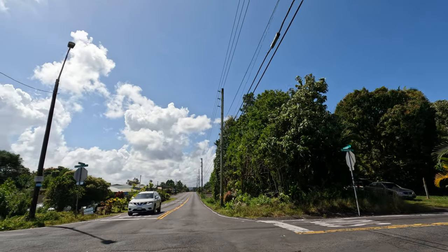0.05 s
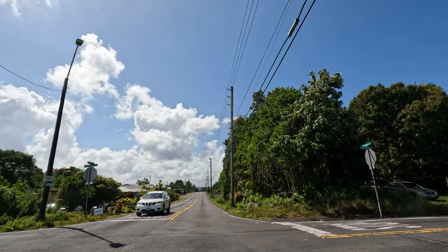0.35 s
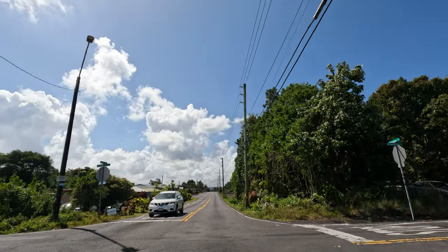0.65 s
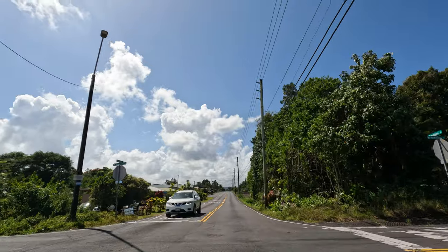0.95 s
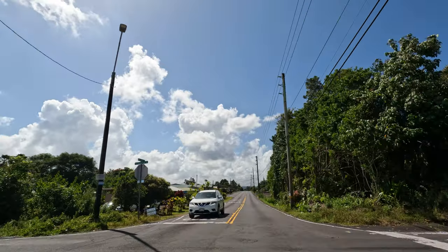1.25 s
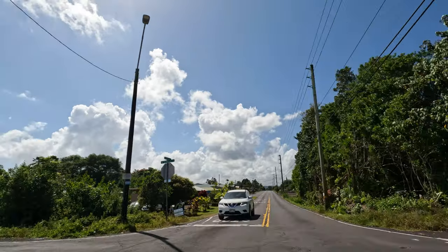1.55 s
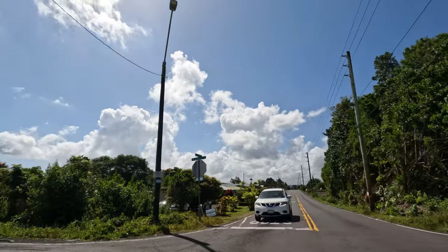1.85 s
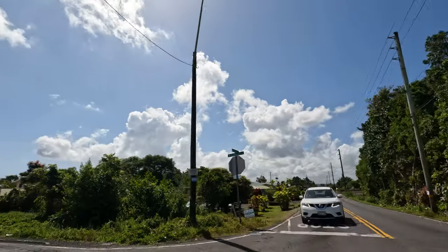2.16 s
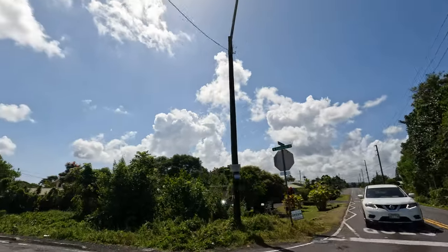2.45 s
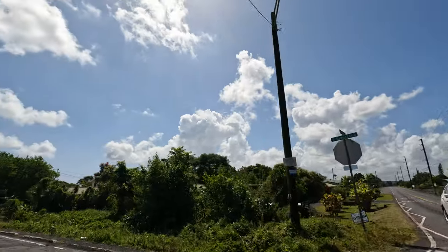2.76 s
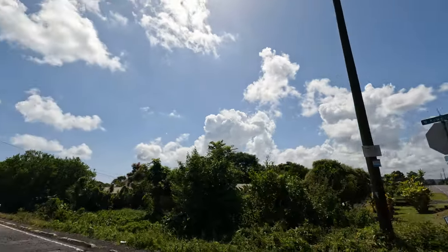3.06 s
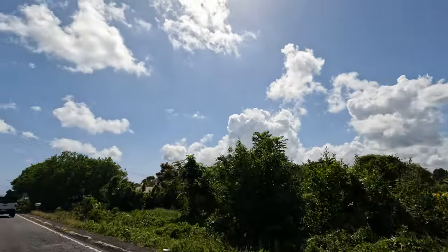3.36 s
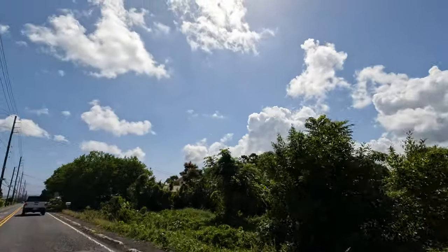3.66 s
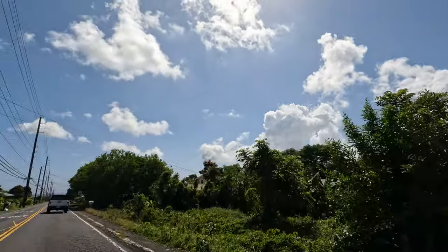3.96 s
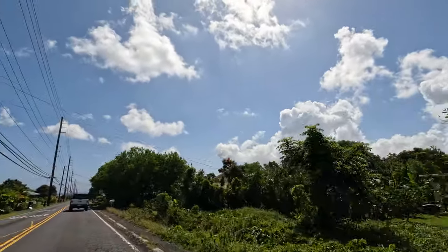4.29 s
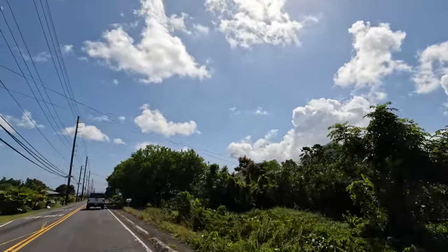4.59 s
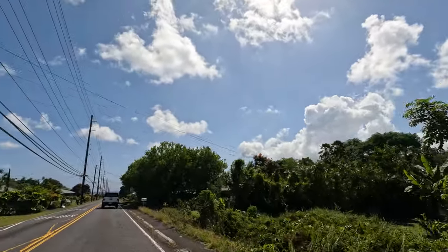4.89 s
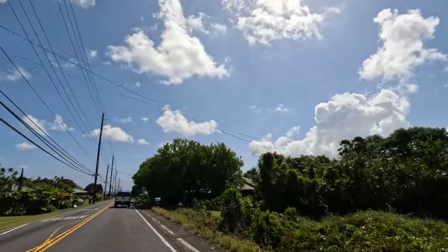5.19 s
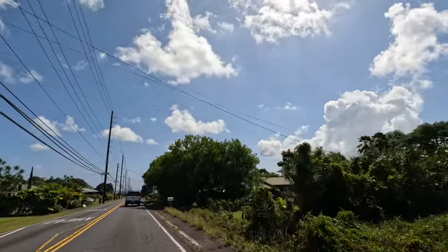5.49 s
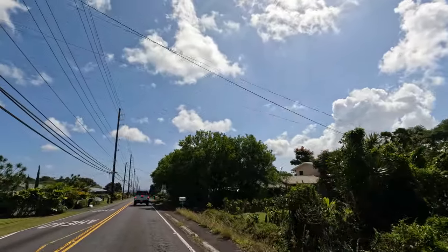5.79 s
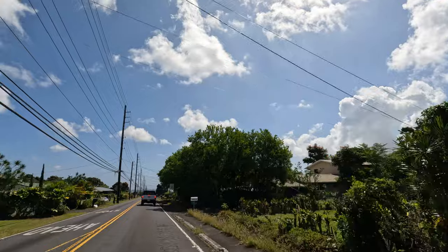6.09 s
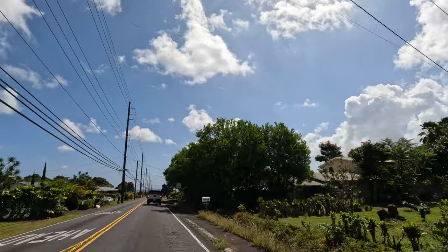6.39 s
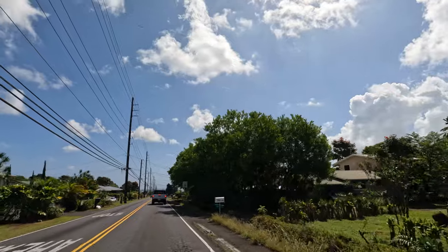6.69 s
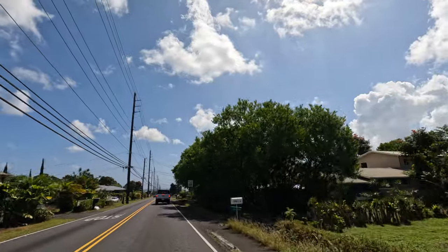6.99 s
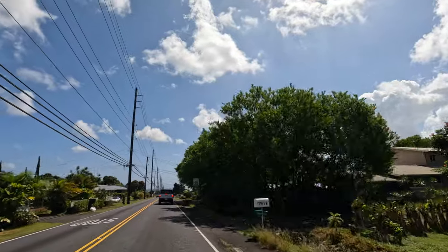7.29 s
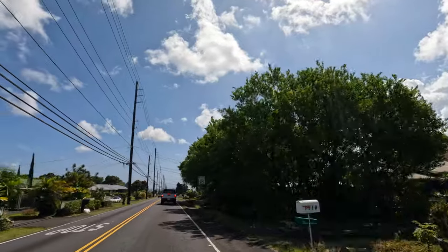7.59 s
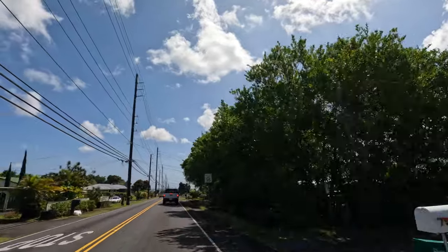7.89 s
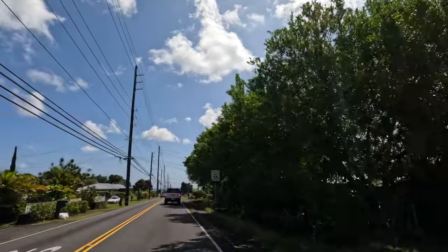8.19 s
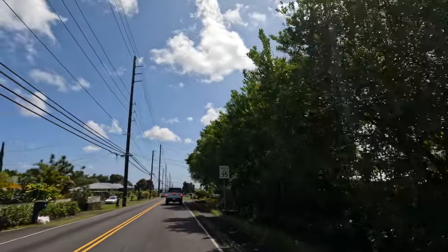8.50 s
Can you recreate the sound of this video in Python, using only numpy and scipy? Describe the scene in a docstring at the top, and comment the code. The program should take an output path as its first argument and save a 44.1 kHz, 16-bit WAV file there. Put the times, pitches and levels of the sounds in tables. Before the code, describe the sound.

Wind buffets and thumps on the microphone of a car gathering speed, over tyre noise on asphalt and faint bird chirps.

```python
"""Car gathering speed on a country road

The microphone rides out in the airstream as the car pulls away from a junction. Eddies thump and slap
right on it and their rush grows with speed, taking over from the tyres on the asphalt below.
Small birds chirp far off in the roadside bushes, faint whines glide and a little grit ticks.
A limiter holds down the strongest buffeting."""
import sys
import numpy as np
from scipy import signal
from scipy.io import wavfile
from scipy.ndimage import uniform_filter1d, minimum_filter1d, map_coordinates

SR = 44100
rng = np.random.default_rng(int(sys.argv[2]) if len(sys.argv) > 2 else 0)


def store_pcm(level_fs):
    """Save levels as 16-bit WAV."""
    pcm = np.round(np.clip(level_fs, -1, 1) * 32767).astype(np.int16)
    wavfile.write(sys.argv[1], SR, np.atleast_2d(pcm).T)


N = 381465
TOP_HZ = 15700

# air moving past the microphone: time_s, share_of_cruising_speed
AIRSPEED = [(0, 0.21), (.55, 0.28), (1.0, 0.42), (2.8, 0.56), (3.6, 0.61), (4.45, 0.66), (4.9, 0.91),
            (6.2, 0.93), (7.4, 0.95), (8.65, 0.98)]
# gusts (+) and lulls (-): middle_s, length_s, rush_swing_db, boom_swing_db, rush_bend_octaves
GUSTS = [(0.052, 0.043, -3, -3.5, 0.0047), (0.189, .17, 4.5, -2, -.2), (.45, 0.35, 4, -2.5, -0.16),
         (0.68, .17, 8, -0.5, .2), (0.785, 0.074, -1, -2, 0), (1.13, .5, -1.5, 1.5, .2),
         (1.53, .2, -2, -7, -0.028), (1.678, 0.1195, 1, 5.5, -0.092), (1.92, 0.183, 1, 1.5, .05),
         (2.35, 0.1995, 1, 2.5, 0.06), (2.578, 0.09, 5, 6, 0.01), (2.7, .16, 2.5, -2.5, 0.31),
         (2.98, .26, 1.5, 2, 0.32), (3.273, 0.23, -1, -3, 0), (3.508, .075, 6, 3, -0.27),
         (3.602, 0.084, 7.5, 4.5, 0.081), (3.7, .18, 2.5, 1, 0.19), (3.848, 0.25, 0.5, 4, -0.0064),
         (4.023, .071, 5.5, -2, -0.22), (4.1, 0.097, 0, -9, 0.0077), (4.15, 0.034, 3, 2, 0.04),
         (4.34, .14, -0.5, -2, 0), (4.449, .08, 9, 4, -0.32), (4.524, .08, 6, 3.5, -0.37),
         (4.651, 0.0641, 5, 3.5, -.1), (4.87, .24, 2.5, -1.5, 0.076), (5.214, 0.0796, 0, 2, -.05),
         (5.38, .28, -2, -5, -0.038), (5.66, 0.11996, -1, 4.5, -.1), (5.99, 0.68, 2.5, 1, 0.011),
         (6.43, .1, -3.5, -1.5, 0.08), (6.6, 0.247, 4.5, 2.5, -0.045), (6.78, 0.1026, 3.5, 2.5, 0.031),
         (6.98, 0.23, -1.5, -0.5, -0.063), (7.16, .16, 1.5, 2.5, -0.11), (7.55, .4, 1, -2, 0),
         (7.95, .1, 0.5, -1.5, -0.0035), (8.1, 0.66, 2, 0, 0.0056), (8.48, .3, 2, 0.5, 0.11),
         (8.64, 0.14, -1.5, -10, 0.09)]


def from_db(db):
    """Decibels to gain."""
    return 10 ** (np.asarray(db) / 20)


def unit_rms(x):
    """Scale to unit power."""
    return x / np.sqrt(np.mean(x ** 2) + 1e-20)


def curves(rows):
    """Each column after time_s, interpolated at every sample."""
    time_s, *columns = np.transpose(rows)
    return [np.interp(np.arange(N) / SR, time_s, column) for column in columns]


def swells(rows):
    """One smooth swell a row (middle_s, length_s, swings); each swing column summed over time."""
    t, rows = np.arange(N) / SR, np.array(rows)
    shapes = [np.cos(np.pi * np.clip((t - middle_s) / length_s, -.5, .5))
              for middle_s, length_s in rows[:, :2]]
    return rows[:, 2:].T @ np.array(shapes)


def band(x, low_hz, high_hz, order):
    """Butterworth band-pass."""
    sos = signal.butter(order, [low_hz, min(high_hz, .45 * SR)], "band", fs=SR, output="sos")
    return signal.sosfilt(sos, x + 1e-18)


def drift(rate_hz):
    """Smooth random wander of rms 1, rolling off above rate_hz."""
    pole = np.exp(-40 * np.pi * rate_hz / SR)
    white = rng.standard_normal(N // 20 + 2002)
    slow = signal.lfilter([1], [1, -2 * pole, pole * pole], white)[2000:]
    return np.interp(np.arange(N) / 20, np.arange(len(slow)), unit_rms(slow))


def coloured_noise(spectrum, flicker_db, flicker_hz):
    """Third-octave bands of noise, each flickering on its own; rms 1."""
    hz, db = np.transpose(spectrum)
    edges_hz = 14 * 2 ** (np.arange(31) / 3)
    white, out = rng.standard_normal((2, N + SR // 2)), np.zeros(N)
    for k, (low, high) in enumerate(zip(edges_hz, edges_hz[1:])):
        centre_hz, flicker = np.sqrt(low * high), drift(flicker_hz)
        if hz[0] <= centre_hz <= hz[-1]:
            level_db = np.interp(np.log(centre_hz), np.log(hz), db)
            out += from_db(level_db + flicker_db * flicker) * band(white[k % 2], low, high, order=3)[-N:]
    return unit_rms(out)


def steady(x, span_s):
    """Even out the slow swells of a noise and keep its quick lumps."""
    return x / np.sqrt(uniform_filter1d(x ** 2, int(span_s * SR)) + 1e-9)


def shifted(x, ratio):
    """Move the whole spectrum of a noise by a changing pitch ratio."""
    return map_coordinates(x, [np.cumsum(ratio)], order=3, mode="mirror")


def glide(pitches_hz, progress, jitter_hz):
    """An unsteady sine sliding through three pitches as progress runs from 0 to 1."""
    hz = np.polyval(np.polyfit([0, .5, 1], pitches_hz, 2), progress) + jitter_hz
    return np.sin(2 * np.pi * np.cumsum(hz) / SR)


def birds(rasp_hz=330, flutter_db=4, waver_db=1.1):
    """Distant birds: each note is a sliding whistle, and a fast uneven tremor makes it rasp."""
    # bird notes: start_s, length_s, start_hz, middle_hz, end_hz, relative_db, rasp_amount
    notes = [(0.102, 0.14, 6620, 5500, 4540, -60.5, .9), (0.233, 0.072, 4080, 3940, 3900, -50, 0.28),
             (.418, .08, 6400, 6230, 6140, -63, .3), (0.472, 0.044, 3960, 3700, 3880, -48.5, 0.4),
             (.523, 0.055, 3710, 3390, 3090, -47, .45), (0.662, 0.052, 6600, 5700, 5020, -54.5, 1.4),
             (0.704, 0.098, 5000, 4520, 4020, -54.5, 0.7), (1.023, 0.07, 5052, 4360, 4150, -56.5, 0.4),
             (1.17, 0.067, 3412, 3012, 2730, -48.5, 0.7), (1.225, 0.054, 2720, 2520, 2510, -46, 0.13),
             (1.19, .1, 5720, 5000, 4422, -62, 0.8), (1.263, 0.083, 3900, 3650, 3590, -53.5, 0.8),
             (1.539, 0.043, 3690, 3870, 3940, -53.5, 0.22), (1.82, 0.067, 4150, 4480, 4696, -64, .5),
             (1.918, 0.069, 4750, 4292, 4000, -67, .5), (2.136, .1, 6500, 6330, 6270, -65, .6),
             (2.22, 0.045, 4180, 4115, 4140, -55, 0.1), (2.278, 0.057, 4170, 4190, 4194, -67, .08),
             (2.401, 0.078, 5516, 4700, 4330, -61, 1.1), (2.692, 0.028, 5700, 5430, 4850, -57, .3),
             (2.725, .05, 4870, 4820, 4780, -61, 0.1), (2.768, 0.056, 4750, 4400, 4286, -57, .15),
             (3.184, 0.052, 5760, 5700, 5510, -61, 0.3), (3.242, 0.055, 5400, 4802, 4500, -58, .22),
             (3.3, 0.076, 4350, 4010, 3680, -61, .4), (3.736, 0.051, 5300, 4750, 4412, -58, 0.9),
             (5.027, 0.099, 7535, 6447, 5293, -68.5, 1), (5.12, 0.085, 4750, 4700, 5000, -68, 0.53)]
    out, wobble, flutter, waver = np.zeros(N), drift(330), drift(200), drift(45)
    for start_s, length_s, *pitches_hz, db, rasp in notes:
        first, n = int(start_s * SR), int(length_s * SR)
        at, progress = slice(first, first + n), np.linspace(0, 1, n)
        tremor = unit_rms(from_db(flutter_db * min(rasp, 1) * flutter[at] + waver_db * waver[at]))
        swell = np.abs(np.sin(np.pi * progress)) ** 0.1
        out[at] += from_db(db) * swell * tremor * glide(pitches_hz, progress, rasp * rasp_hz * wobble[at])
    return out


def trees(x, direct_db=3.5, wet_db=1.0, t60_s=0.67, count=90):
    """Roadside trunks and leaves scatter many weak, late copies."""
    out = from_db(direct_db) * x
    for delay_s, strength in zip(rng.uniform(0.0034, 0.22, count), rng.standard_normal(count)):
        lag = int(delay_s * SR)
        out[lag:] += from_db(wet_db - 60 * delay_s / t60_s) * 2 * strength / np.sqrt(count) * x[:-lag]
    return out


def whines(waver_db=2.0):
    """Thin tones swell, glide and fade in the road and wind noise; pitch and strength waver."""
    # gliding tones: start_s, end_s, start_hz, middle_hz, end_hz, jitter_hz, level_db
    tones = [(2.0, 2.679, 2651, 2792, 2940, 40, -55), (2.659, 3.123, 2930, 2850, 2770, 60, -52.5),
             (3.25, 3.72, 2530, 2460, 2410, 25, -58), (3.998, 5.048, 2520, 2609, 2720, 70.7, -58),
             (4.38, 4.92, 3289, 3270, 3332, 9.3, -57.5), (4.965, 5.034, 521, 482, 432, 4, -29)]
    out, jitter, waver = np.zeros(N), drift(120), drift(11)
    for start_s, end_s, *pitches_hz, jitter_hz, db in tones:
        at = slice(int(start_s * SR), int(end_s * SR))
        progress = np.linspace(0, 1, len(out[at]))
        swell = from_db(db + waver_db * waver[at]) * np.sqrt(np.abs(np.sin(np.pi * progress)))
        out[at] += swell * glide(pitches_hz, progress, jitter_hz * jitter[at])
    return out


def grit(decay_s=0.0018):
    """Each grain flicked up by the tyres is a short bright tick."""
    # grains: start_s, relative_db
    grains = [(4.728, -54), (4.807, -44), (4.833, -54), (4.871, -58)]
    t, out = np.arange(SR // 50) / SR, np.zeros(N)
    for start_s, db in grains:
        at = int(start_s * SR)
        out[at:at + len(t)] += from_db(db) * rng.standard_normal(len(t)) * np.exp(-t / decay_s)
    return band(out, 3500, 7500, order=3)


def tyres(edge_hz=6900, above_edge_db=-10, gust_share=0.24):
    """Below the microphone, tread roars on asphalt under a grainy hiss that dulls abruptly at the top."""
    # tyre noise along the road: time_s, tread_relative_db, hiss_relative_db
    road_levels = [(0.03, -40.5, -58), (.35, -37, -60.5), (.7, -36, -59), (1.05, -38, -58.5),
                   (2.25, -38.3, -62.5), (2.65, -37, -62.5), (3.05, -38, -60.5), (4.1, -42.5, -61.5),
                   (4.85, -44.5, -61.3), (5.02, -47, -63), (5.3, -50.5, -66.5), (5.65, -51, -67),
                   (5.85, -47.5, -63.5), (6.5, -48, -68), (7.15, -49.5, -66.5), (8.3, -47, -67),
                   (8.62, -50.5, -67)]
    # spectra of the roar and the hiss: frequency_hz, relative_density_db
    tread_spectrum = [(350, -9), (700, 1), (950, 1.5), (1350, -1.5), (2000, -8), (2800, -13.5), (3700, -30),
                      (6000, -42.5)]
    hiss_spectrum = [(1800, -5.5), (2900, 3), (3600, 1), (5000, -3.5), (6400, -8), (8000, -7.5),
                     (10000, -18.5), (12800, -32.5)]
    # the hiss swishes (+) and dips (-): middle_s, length_s, swing_db
    swishes = [(.78, 0.31, 3), (1.83, .14, 2.5), (3.02, .14, 2), (5.55, .12, 1), (6.33, .12, 1),
               (6.43, 0.097, -3), (6.61, .14, 3), (6.755, 0.086, -3.5), (6.84, 0.069, 2.5),
               (7.1, 0.084, -2.5), (7.62, 0.13, 1.5), (7.9, 0.25, 0.5), (8.15, 0.079, 3), (8.52, .09, 2)]
    tread_db, hiss_db = curves(road_levels)
    tread = from_db(tread_db + 1.5) * coloured_noise(tread_spectrum, flicker_db=.5, flicker_hz=32)
    swing_db = gust_share * swells(GUSTS)[0] + swells(swishes)[0]
    hiss = coloured_noise(hiss_spectrum, flicker_db=1.0, flicker_hz=13)
    below = signal.sosfilt(signal.cheby1(10, .5, edge_hz, fs=SR, output="sos"), hiss)
    above = from_db(above_edge_db) * band(hiss, edge_hz, TOP_HZ, order=6)
    grain_db = 0.69 * drift(90)
    return tread + from_db(hiss_db + 6.5 + swing_db + grain_db) * unit_rms(below + above)


def thuds():
    """Single large eddies hit the microphone, each a short swell of low-middle noise."""
    # eddies: middle_s, length_s, level_db
    eddies = [(0.196, 0.18, -33.5), (4.033, 0.037, -27.5), (4.455, .07, -24.5), (4.533, 0.064, -22),
              (5.21, .06, -25), (5.95, 0.055, -25.5), (6.102, 0.044, -22), (6.6, 0.11, -27),
              (2.568, 0.05, -28), (8.092, 0.075, -25)]
    # their spectrum: frequency_hz, relative_density_db
    thud_spectrum = [(130, -10), (190, 2.5), (270, 2), (340, -6), (450, -23)]
    body = steady(coloured_noise(thud_spectrum, flicker_db=4.0, flicker_hz=20), span_s=.03)
    return body * swells([(middle_s, length_s, from_db(db)) for middle_s, length_s, db in eddies])[0]


def slaps():
    """An eddy bursting on the microphone port pushes and pulls once; wider ones sound lower."""
    # slaps of air: middle_s, peak_db, half_width_s
    bursts = [(0.2, -15.5, 0.001), (.648, -12, 0.00065), (.653, -23, 0.0013), (0.662, -11.5, 0.0012),
              (.685, -19, 0.00053), (0.69, -15, 0.0012), (0.703, -19, 0.00045), (3.505, -18, 0.00068),
              (3.597, -20, 0.00058), (4.021, -17, 0.001), (4.15, -14.5, 0.00052), (4.446, -19, 0.0008),
              (4.521, -13.5, 0.0011), (4.644, -12, 0.00088), (5.215, -14, 0.00066), (6.043, -18, 0.00061),
              (6.649, -16, 0.0006), (6.737, -19, 0.00082), (6.74, -12.5, 0.00041), (7.172, -13, 0.00058)]
    t, out = np.arange(N) / SR, np.zeros(N)
    for middle_s, db, half_width_s in bursts:
        offset = (t - middle_s) / half_width_s
        out -= from_db(db) * offset * np.exp(.5 - .5 * np.minimum(offset ** 2, 100))
    return out


def vortex_hum(pitch_hz, blur_hz=59):
    """Vortices shed from an edge hum; uneven shedding blurs the pitch."""
    phase = 2 * np.pi * np.cumsum(pitch_hz) / SR
    wander = signal.sosfilt(signal.butter(3, blur_hz, fs=SR, output="sos"), rng.standard_normal((2, N)))
    return unit_rms(wander[0] * np.cos(phase) + wander[1] * np.sin(phase))


def air_rush(speed, bend, cruise_hum_hz=436.7):
    """Small eddies rush in bursts; with speed they brighten and the vortex hum rises and stands out."""
    # small eddies: frequency_hz, relative_density_db
    rush_spectrum = [(120, -21), (195, 1.5), (260, 2), (320, 4), (400, 1.5), (520, 1), (640, -8.5),
                     (820, -14), (1500, -26.5), (3000, -58.5)]
    hum = vortex_hum(cruise_hum_hz * speed * bend ** .5)
    hum_share = 0.4 * speed ** 1.3
    broad = shifted(coloured_noise(rush_spectrum, flicker_db=0.87, flicker_hz=37), bend * speed ** .06)
    rush = steady(np.sqrt(1 - hum_share) * broad + np.sqrt(hum_share) * hum, span_s=0.14)
    return rush * unit_rms(from_db(0.75 * drift(29)))


def wind():
    """Large eddies buffet and boom on the microphone under the rush; gusts bend boom and rush in pitch."""
    # spectra of the large eddies: frequency_hz, relative_density_db
    buffet_spectrum = [(14, -0.5), (25, 1.5), (40, 4), (65, 0), (85, -1), (120, -18), (200, -35)]
    boom_spectrum = [(60, -11.5), (85, -2.5), (105, -0.5), (130, -2), (165, -10), (220, -12.5), (320, -26),
                     (600, -52)]
    # the deep buffeting heaves (+) and drops out (-): middle_s, length_s, swing_db
    heaves = [(.38, 0.25, -3), (.77, .1, -3.5), (.9, .14, 2.5), (1.38, 0.16, 2), (2.25, .1, -4),
              (2.88, .12, 3), (3.1, 0.12, 2), (3.24, 0.14, -5), (3.55, .14, -1.5), (3.9, 0.13, 2),
              (4.78, .12, 2), (6.4, 0.16, -4), (6.75, 0.15, 2), (7.25, 0.15, 2), (7.41, .1, -3.5),
              (7.82, 0.1, -1.5), (8.52, .14, -4.5)]
    speed = curves(AIRSPEED)[0]
    rush_swing_db, boom_swing_db, bend_octaves = swells(GUSTS)
    bend, decades = 2 ** bend_octaves, np.log10(speed)
    # each layer: level at cruising speed, growth per tenfold speed, then swings
    buffet_db = -19 + 5.5 * decades + swells(heaves)[0] + 1.73 * drift(7.0)
    boom_db = -22.5 + 6.9 * decades + boom_swing_db + 0.55 * drift(6.8)
    rush_db = -27 + 17.5 * decades + rush_swing_db
    buffet = steady(coloured_noise(buffet_spectrum, flicker_db=-2.9, flicker_hz=3.7), span_s=0.13)
    boom = coloured_noise(boom_spectrum, flicker_db=-0.05, flicker_hz=10)
    boom = steady(shifted(boom, bend ** .45), span_s=0.098)
    return from_db(buffet_db) * buffet + from_db(boom_db) * boom + from_db(rush_db) * air_rush(speed, bend)


def scene():
    """One microphone: wind right on it, the road below, birds away among the trees."""
    return (wind() + thuds() + slaps() + tyres() + whines() + grit() + trees(birds()))[None]


def record(dry, ceiling_db=-9.0, release_db_per_s=90, fade_s=.012):
    """A look-ahead limiter ducks the strongest thumps; the ends fade and the top is cut."""
    t = np.arange(N) / SR
    over_db = np.maximum(20 * np.log10(np.abs(dry[0]) + 1e-9) - ceiling_db, 0)
    release_db = release_db_per_s * t
    duck_db = release_db - np.maximum.accumulate(over_db + release_db)
    gain_db = uniform_filter1d(minimum_filter1d(duck_db, size=200), size=300)
    fade = np.minimum(np.minimum(t, t[::-1]) / fade_s, 1)
    top_cut = signal.cheby2(12, 70, TOP_HZ, fs=SR, output="sos")
    return signal.sosfilt(top_cut, dry * from_db(gain_db) * fade)


dry = scene()
out = record(dry)
store_pcm(out)
```